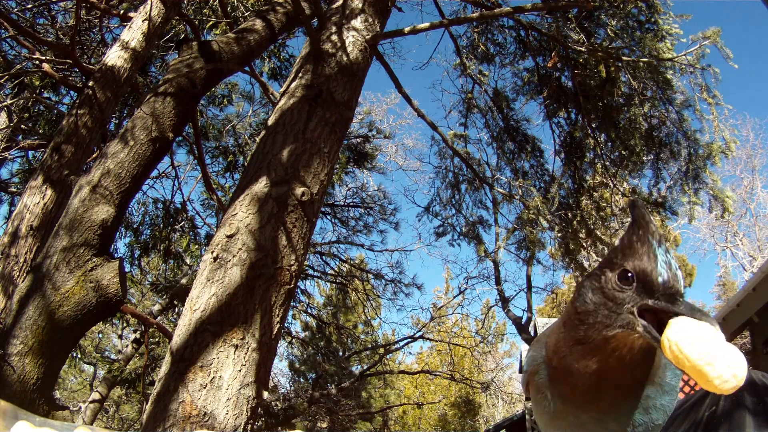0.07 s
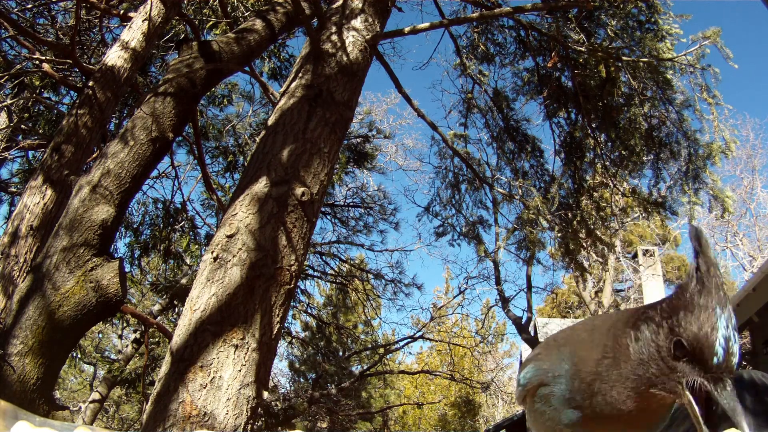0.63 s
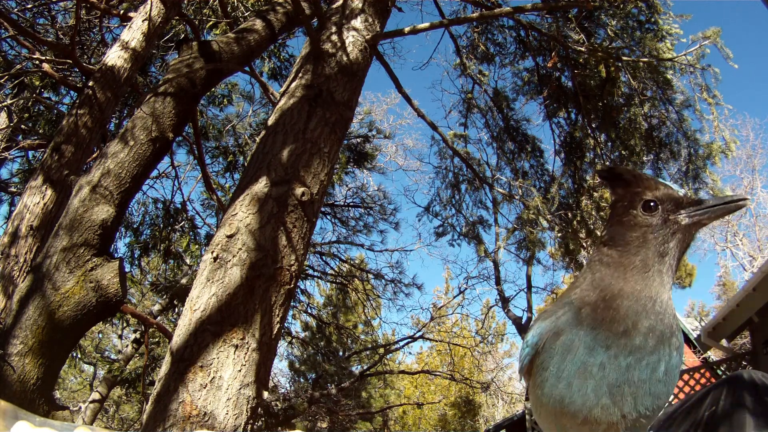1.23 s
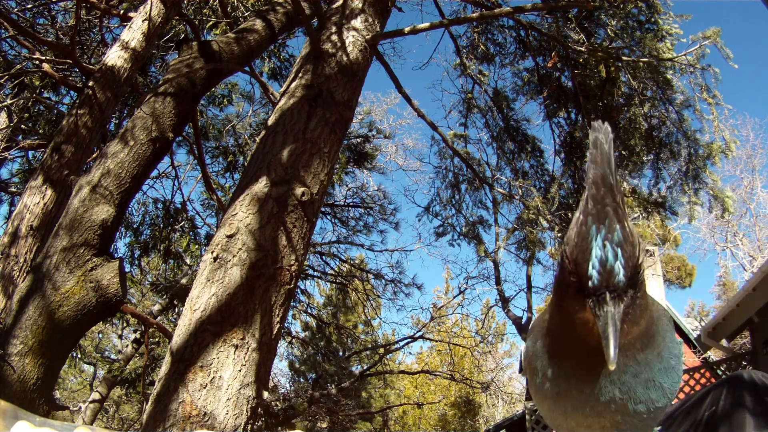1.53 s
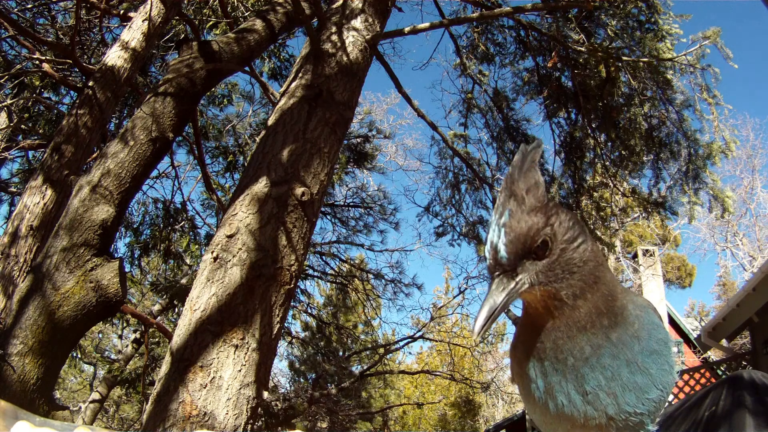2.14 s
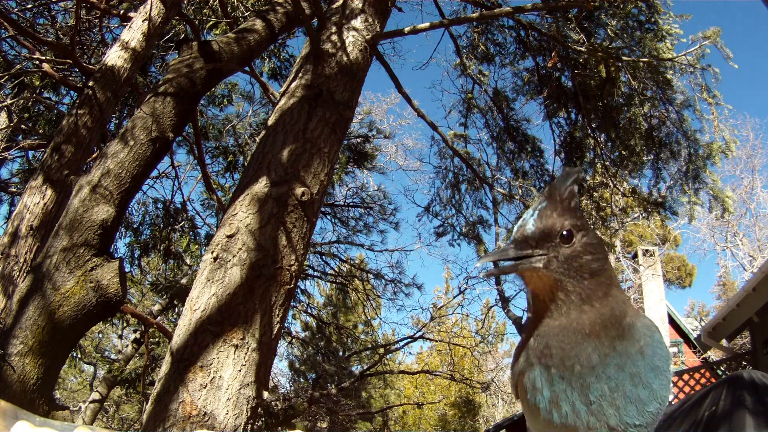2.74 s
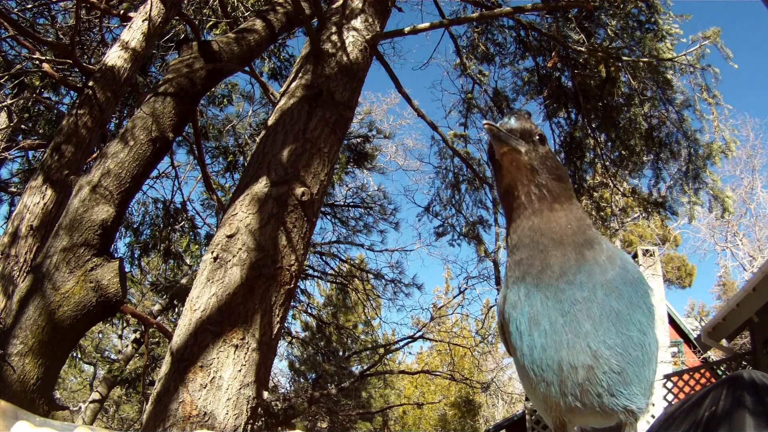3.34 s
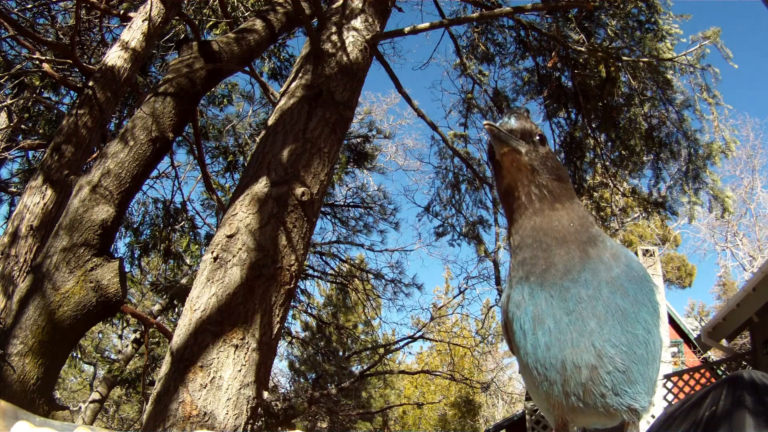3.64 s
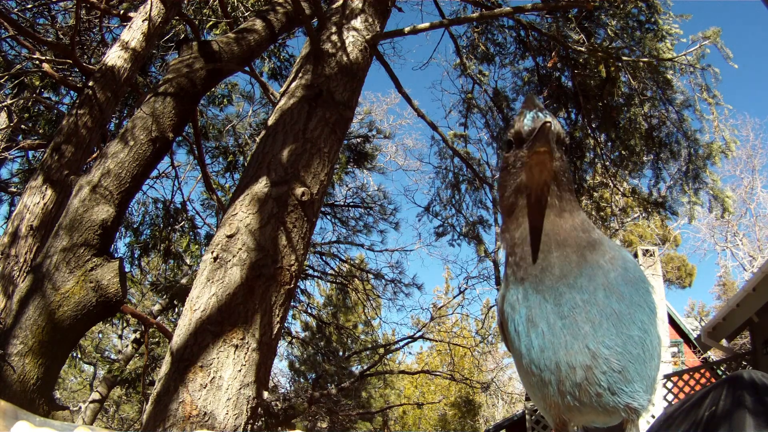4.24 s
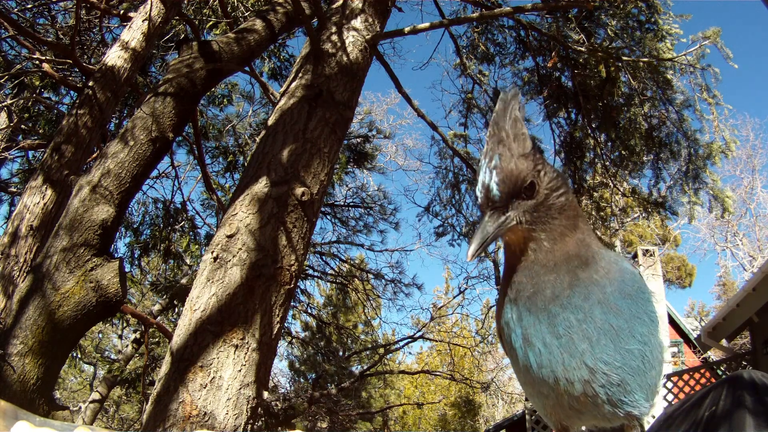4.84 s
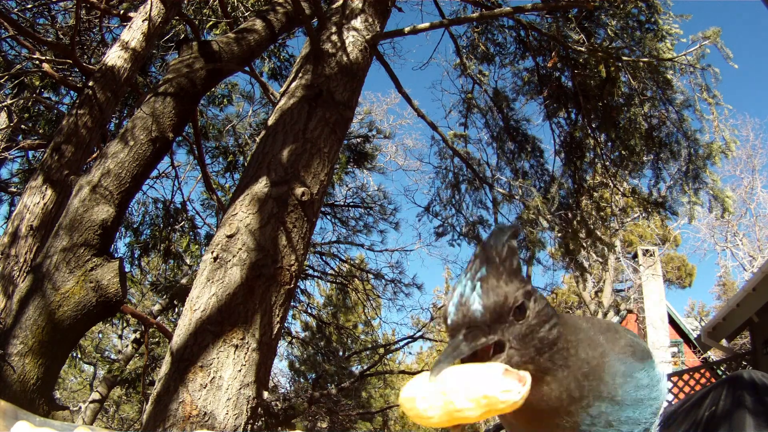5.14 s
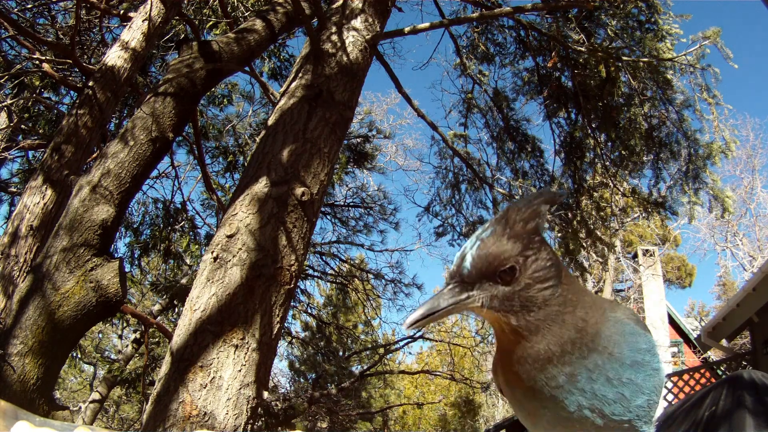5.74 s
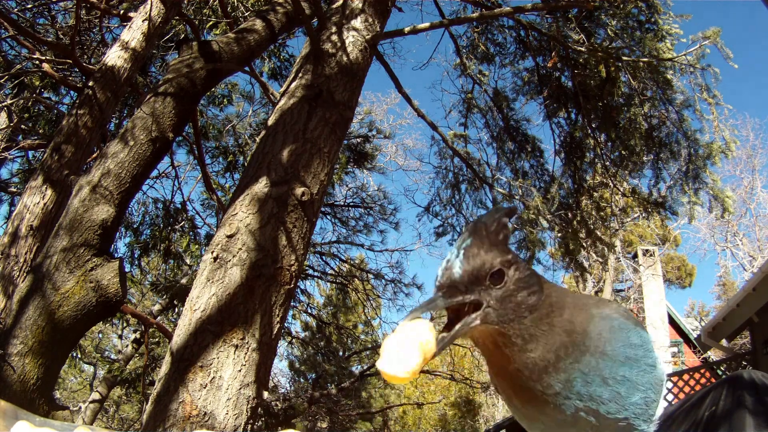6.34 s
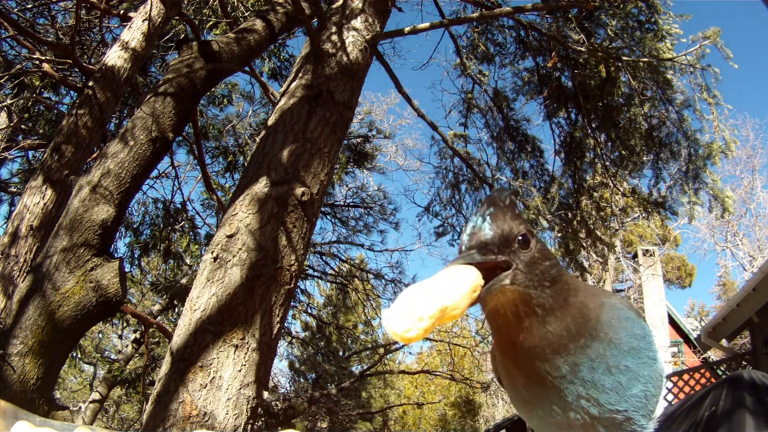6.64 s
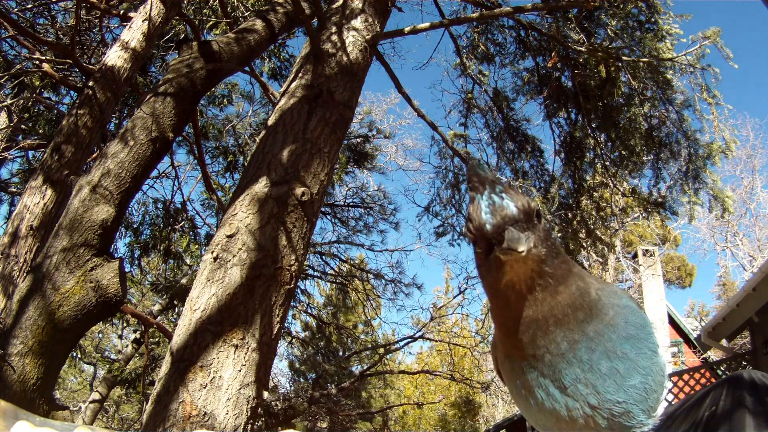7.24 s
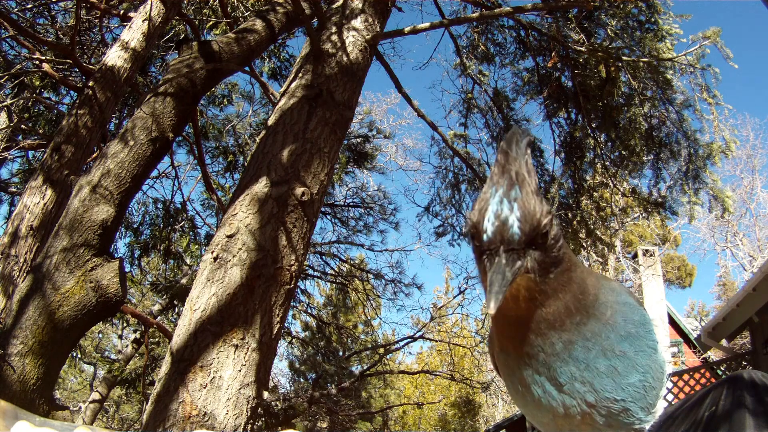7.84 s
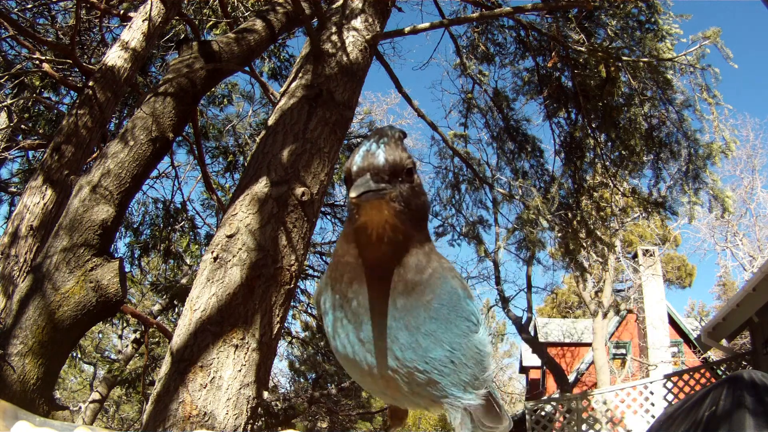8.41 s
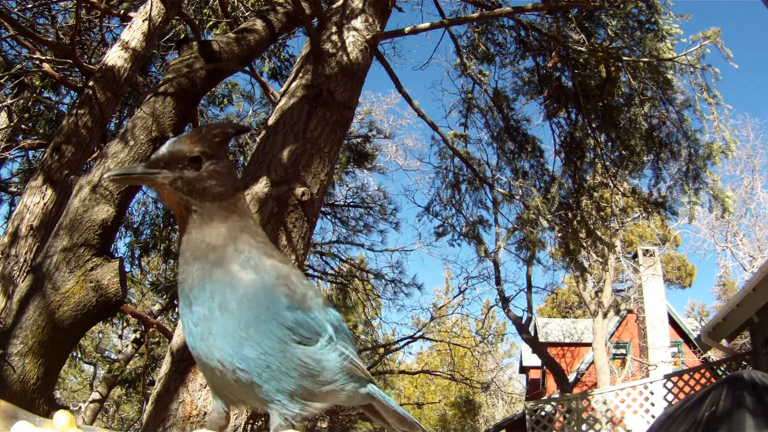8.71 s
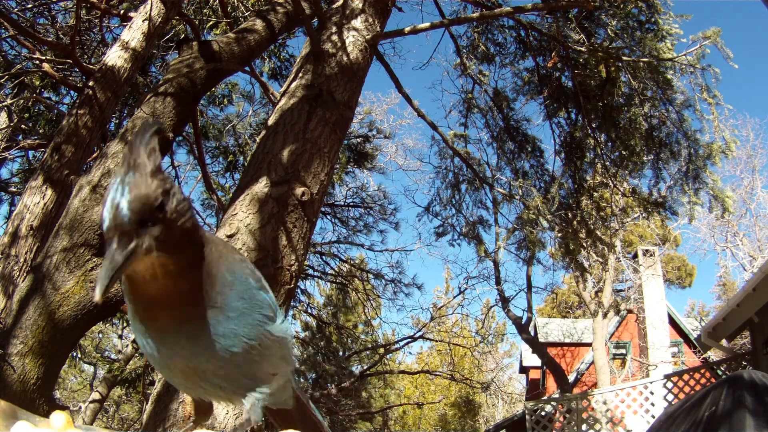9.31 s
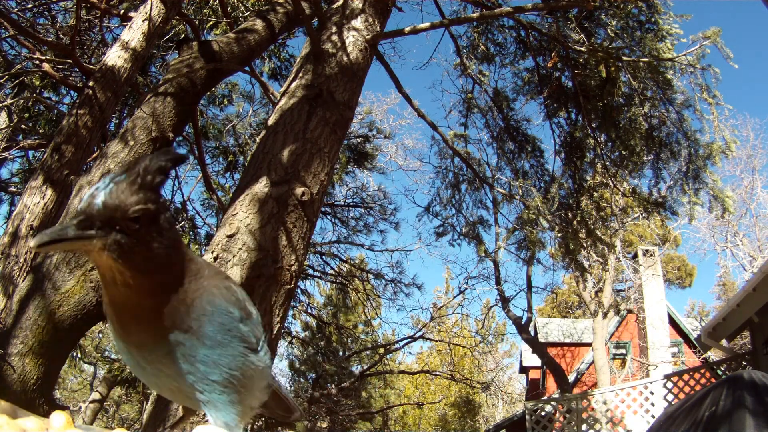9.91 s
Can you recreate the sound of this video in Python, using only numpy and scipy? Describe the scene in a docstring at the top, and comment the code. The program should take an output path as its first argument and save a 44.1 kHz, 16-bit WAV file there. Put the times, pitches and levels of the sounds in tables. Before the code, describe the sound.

A bird knocks and rattles hollow peanut shells on a tray close by, then hops with rustling wing beats over a faint engine drone.

```python
"""A jay picks up peanuts in the shell from a feeding tray, weighs them and puts them back, very close by.
The hollow shells crack and rattle as they knock, rasp as they slide, and make the tray boom softly.
The bird hops about with ticking claws and short wing beats that rustle and push the air.
One nut falls and bounces with a bright clack. Behind it all are a quiet garden and a far, droning engine."""
import sys
import numpy as np
from scipy import signal
from scipy.fft import rfft, irfft
from scipy.io import wavfile
from scipy.ndimage import map_coordinates

SR = 44100
rng = np.random.default_rng(int(sys.argv[2]) if len(sys.argv) > 2 else 0)


def dump(signal):
    """Clip the signal to [-1, 1] and save it as 16-bit WAV at the path in sys.argv[1]."""
    limited = np.clip(np.atleast_2d(signal).T, -1, 1)
    pcm = np.round(limited * 32767).astype(np.int16)
    wavfile.write(sys.argv[1], SR, pcm)


N = 439676


def amp(db):
    """Turns decibels into a number to multiply by."""
    return 10 ** (np.asarray(db) / 20)


def unit(x):
    """Scales a sound to an average strength (rms) of 1."""
    return x / np.sqrt(np.mean(x ** 2) + 1e-20)


def add(mix, start, sound):
    """Mixes a sound in at a start time in seconds."""
    part = mix[max(round(start * SR), 0):][:len(sound)]
    part += sound[:len(part)]


def wander(size, rate):
    """A smooth random curve that changes about rate times a second."""
    at = np.arange(size) * rate / SR
    return map_coordinates(rng.standard_normal(int(at[-1]) + 3), [at], order=2, mode="nearest")


def ring(tones, size, detune, scale=1):
    """A struck thing rings with dying tones, a little different for each spot that is hit."""
    t = np.arange(size) / SR
    shifts = scale * np.exp(detune * rng.standard_normal(len(tones)))
    return sum(amp(db - 60 * t / fade_s) * np.cos(2 * np.pi * hz * shift * t)
               for (hz, db, fade_s), shift in zip(tones, shifts))


def grains(size, per_s, spread_db):
    """Tiny clicks at random moments, of uneven strength."""
    strength = amp(spread_db * np.minimum(rng.exponential(1, size), 3.5))
    return unit(strength * rng.choice([-1, 1], size) * (rng.random(size) < per_s / SR))


def stroke(length_s, rise_s, fall_s):
    """The loudness of a movement: it swells, holds and dies away."""
    t = np.arange(int((length_s + 6 * fall_s) * SR)) / SR
    return (1 - np.exp(-t / rise_s)) * np.exp(-np.maximum(t - length_s, 0) / fall_s)


# pitches the microphone barely hears: (pitch [Hz], width [Hz], depth [dB])
DEAF_BANDS = [(6020, 420, -18), (12050, 880, -20)]
def shape_tone(x, colour):
    """Gives a sound its tone colour, turns down the deaf bands and scales it to strength 1."""
    f = np.fft.rfftfreq(len(x), 1 / SR)
    dips_db = sum(depth * np.exp(-abs((f - hz) / width) ** 1.4) for hz, width, depth in DEAF_BANDS)
    hz, db = np.transpose(colour)
    colour_db = np.interp(np.log(f + 1), np.log(hz), db)
    return unit(irfft(rfft(x) * amp(dips_db + colour_db), len(x)))


# tone colour of the garden: (pitch [Hz], level [dB])
GARDEN_COLOUR = [(20, -11.5), (40, -2), (58, -3), (90, -2.5), (130, -5), (190, -7), (280, -9), (450, -14.5),
                 (700, -19.5), (1500, -24.5), (3000, -27.5), (7500, -34.5), (13200, -40), (14000, -51)]
def garden(level_db=-58.0, swell_db=0.1):
    """The garden is a far rumble and a soft, even hiss."""
    loudness = amp(level_db + swell_db * wander(N, 2.665))
    return loudness * shape_tone(rng.standard_normal(N), GARDEN_COLOUR)


# how the engine runs: (time [s], cycle rate [Hz], level [dB])
ENGINE_RUN = [(0.0, 37.65, -55), (1.2, 37.14, -53.5), (2.2, 36.91, -51.5), (3.3, 36.95, -53.5),
              (4.2, 36.97, -52), (5.3, 36.85, -49.5), (6.6, 36.97, -51.5), (7.8, 36.7, -56.5),
              (9.95, 36.19, -60)]
# its tones: (pitch [x cycle rate], level [dB], drift [dB/s], echo strength [x direct sound],
# time between swells [s], time of one swell [s])
ENGINE_TONES = [(2.0, -2, -0.11, 0.43, 9.0, 0.18), (3.0, 0.0, 0.0, 0.25, 2.37, 1.84),
                (4.0, 3, -1.26, 0.45, 3.67, 2.03), (4.5, -12.57, 1.03, 0.12, 2.27, 0.13),
                (6.0, -10, 0.0, 0.46, 5.13, 0.42)]
def engine(waver_db=0.5):
    """A far engine's low tones stay roughly in step with its firing, so the drone throbs."""
    t = np.arange(N) / SR
    times, cycle_hz, run_db = np.transpose(ENGINE_RUN)
    cycles = np.cumsum(np.interp(t, times, cycle_hz)) / SR + 2 * rng.random()
    drone = np.zeros(N)
    for multiple, db, drift, echo, period, crest in ENGINE_TONES:
        # the tone swells and fades as its echo drifts in and out of step with it
        swell = abs(1 + echo * np.exp(2j * np.pi * (t - crest) / period))
        level = amp(np.interp(t, times, run_db) + db + drift * t + waver_db * wander(N, 5))
        tone = np.cos(2 * np.pi * multiple * cycles + 0.5 * rng.standard_normal())
        drone += np.sqrt(2) * swell * level * tone
    return drone


# borders of a knock's five bands, called body, low middle, high middle, edge and top: (pitch [Hz])
KNOCK_BANDS = [300, 900, 2000, 3500, 8400, 15500]
def knocks(contacts, tones, colour, detune, ring_db, crush_db, crush_s, scatter_db, scatter_s):
    """Each contact snaps and briefly crushes ridges; the shell rings and things nearby scatter the sound."""
    out = np.zeros(N)
    size, lead, blow = 2048, 128, 256  # samples: whole knock, part before the snap, loud opening
    t = (np.arange(size) - lead) / SR
    bands = [signal.butter(3, edges, "band", fs=SR, output="sos")
             for edges in zip(KNOCK_BANDS, KNOCK_BANDS[1:])]
    crush = amp(crush_db) * np.exp(-abs(t) / np.where(t < 0, 0.7 * crush_s, crush_s))
    scatter = amp(scatter_db) * np.exp(-abs(t) / scatter_s) * (t > 0)
    for time, hz, db, body_db, edge_db, top_db in contacts:
        force = (crush + scatter) * rng.standard_normal(size)
        force[lead] += rng.choice([-1, 1])  # the snap
        ringing = signal.fftconvolve(force, ring(tones, size, detune, scale=hz))[:size]
        sound = shape_tone(force + amp(ring_db) * ringing, colour)
        # the middle leans towards the main pitch; the contact's hardness sets the bands around it
        upper = np.clip(1 / (1 + (KNOCK_BANDS[2] / hz) ** 5), 0.17, 0.85)
        shares = amp(body_db), np.sqrt(1 - upper), np.sqrt(upper), amp(edge_db), amp(top_db)
        for band, share in zip(bands, shares):
            part = signal.sosfilt(band, sound)
            add(out, time + t[0], amp(db) * share * part / np.std(part[:blow]))
    return out


# beak and shell knock on the tray; body and edge count from the knock's level:
# (time [s], main pitch [Hz], level [dB], hollow body [dB], hard edge [dB], change per rebound [dB])
SHELL_TAPS = [(0.248, 1800, -46.5, -7, -19, -7), (0.271, 1630, -35.5, -16, -27, -30),
              (0.3002, 1700, -34.5, -13, -7, -25), (0.3043, 2100, -24, -6, -32, -22),
              (0.3229, 1300, -34, -2.5, -11, -6.5), (0.3393, 2130, -37.5, -11, -27, -20),
              (0.3909, 1920, -46.5, -13, -25, -20), (0.502, 2550, -38.5, -9, -7, -20),
              (0.5128, 1900, -37, -6, -8.5, -6.5), (0.6025, 1810, -34, -17, -17, -6),
              (0.6123, 2480, -34, -14, -9, -30), (0.6905, 1680, -34.5, -10.5, -13, -2.5),
              (0.7113, 2020, -39, -8, -8, -20), (0.7768, 2010, -31, -10.5, -17, -13),
              (0.7981, 2580, -24, -25, -29, -22), (0.8012, 2450, -38, 1.5, -7, -18),
              (0.9198, 1390, -36, -11.5, -18, -19), (0.9259, 1260, -38, -19, -23, -25),
              (1.2847, 2670, -46.5, -29, -7.5, -6), (2.3614, 2040, -43, -4, -19, -2),
              (2.3706, 1490, -38, -6, -6.5, -4), (2.4088, 2130, -37, -21, -20, -20),
              (2.4165, 2050, -34.5, -21, -20, -13), (2.4323, 1580, -34.5, -27, -26, -18),
              (2.4495, 2190, -44, -16, -16, -16), (2.4887, 1950, -29.5, -15, -11, -3),
              (2.5418, 2800, -62, -7, 7, -20), (2.6795, 1900, -31.5, -10.5, -4, -5),
              (3.157, 3300, -57.5, -7, -6, -3), (4.93, 2300, -49, -12, -9, -18),
              (5.0084, 1780, -30.5, -6, -18.5, -29), (5.116, 2750, -50, -8, -3, -20),
              (5.2271, 1560, -28.5, -8, -8, -6.5), (5.3391, 2120, -54, -19, -2, -20),
              (5.4767, 2307, -50, -18, -8, -2), (5.5237, 1590, -44.5, -5, -8, -14),
              (5.5404, 2240, -35.5, -10.5, -11, -6), (5.982, 1420, -50, -8, -8, -13),
              (5.9983, 2024, -46.5, -9, -7.5, -1), (6.1019, 2100, -27, -14, -7.5, -16),
              (6.1513, 2280, -46.5, -11, -8, -21), (6.1666, 2540, -51.5, -3, -7, -15),
              (6.375, 1860, -47.5, -12, -15, -1.5), (6.4902, 2430, -37, -11, -7, -2.5),
              (6.6411, 1530, -46.5, -4, -9, -15), (6.7022, 1780, -36.5, -4, -11, -24),
              (6.7216, 1580, -26, -6, -10.5, -17), (6.736, 2000, -36, -11, -10, -18),
              (6.7618, 1906, -40.5, -13, -19, -20), (7.6111, 1920, -51, -21, -13, -5),
              (9.5322, 2020, -36, -9, -13.5, -3.5), (9.5583, 1760, -37.5, -8.5, -20, -12),
              (9.7064, 1850, -32, -18, -7.5, -5.5), (9.7158, 3030, -29, -9, -10.5, -7)]
def rattles(graze_s=0.0024, graze_db=-19, rebound_s=0.0044, rebounds=2, top_db=-13):
    """Lists each tap's contacts: a light graze, the blow, then weaker rebounds on other spots."""
    contacts = []
    for time, hz, db, body_db, edge_db, rebound_db in SHELL_TAPS:
        hardness = body_db, edge_db, top_db
        contacts += [(time - graze_s, hz, db + graze_db, *hardness), (time, hz, db, *hardness)]
        for gap, spot in rng.standard_normal((rebounds, 2)):
            time += rebound_s * np.exp(0.15 * gap)
            db += rebound_db
            contacts.append((time, hz * np.exp(0.053 * spot), db, *hardness))
    return contacts


# tones of a shell held by beak or tray: (pitch [x main pitch], level [dB], time to fade 60 dB [s])
HELD_SHELL_TONES = [(.62, -6, .006), (1, 0, .007), (1.4, -4, .005), (2.1, -11, .004)]
# tone colour of a shell's brittle snap: (pitch [Hz], level [dB])
SNAP_COLOUR = [(300, -10), (420, -1.5), (800, -0.5), (1300, 8), (2600, -0.5), (4500, -3.5), (5300, -1.5),
               (7500, -6), (9800, 0), (14200, -3), (15200, -10)]
def shells(gain_db=-3):
    """A held peanut cannot ring long, so it gives a dry crack. Claws and nudged shells tick alike."""
    contacts = rattles() + claws()
    contacts += nudges(SHELL_DRAGS, above_db=1, spread_db=6, hz=1950, body_db=-11, edge_db=-16, count=4)
    contacts += nudges(WING_BEATS, above_db=2.5, spread_db=7.5, hz=2300, body_db=-12, edge_db=-2, count=3)
    return amp(gain_db) * knocks(contacts, HELD_SHELL_TONES, SNAP_COLOUR, detune=0.036, ring_db=-25,
                                 crush_db=-17, crush_s=0.0011, scatter_db=-32.5, scatter_s=0.0039)


# tones of the tray: (pitch [Hz], level [dB], time to fade 60 dB [s])
TRAY_TONES = [(88, -9, .12), (168, 0, .2), (402, -14, .08), (565, -20, .04)]
def tray(knock_db=-17, hop_db=2, strong_beat_db=-46, lag_s=0.00647):
    """The tray booms softly under each tap, and when the bird pushes off with a strong wing beat."""
    out = np.zeros(N)
    blows = [(time, db + knock_db) for time, _, db, *_ in SHELL_TAPS]
    blows += [(start + lag_s, db + hop_db) for start, _, db, _ in WING_BEATS if db > strong_beat_db]
    for time, db in blows:
        add(out, time, amp(db) * ring(TRAY_TONES, size=12000, detune=0.0045))
    return out


# shells dragged over the tray and each other: (start [s], end [s], level [dB])
SHELL_DRAGS = [(0.304, 0.342, -49.5), (0.495, 0.52, -49.5), (1.273, 1.306, -71), (2.356, 2.445, -42.5),
               (2.458, 2.548, -55), (2.488, 2.51, -44.5), (4.972, 5.047, -56.5), (5.231, 5.243, -49.5),
               (5.968, 6.025, -56.5), (6.363, 6.4, -58.5), (6.711, 6.769, -61), (9.701, 9.727, -44)]
# tone colour of their rasp: (pitch [Hz], level [dB])
RASP_COLOUR = [(150, -10), (400, 4.5), (900, 5), (1500, 2), (2400, 0.5), (3500, -3.5), (5000, -7),
               (7500, -10.5), (9700, -7), (14400, -14), (15500, -34)]
def scrapes(gain_db=-1, judder_db=1, ring_db=-27, shell_hz=1950, slide_s=0.02, slide_db=-26):
    """A ridged shell slides in tiny catches that make it ring. Every tap also ends in a short slide."""
    out = np.zeros(N)
    slides = [(time, time + slide_s, db + slide_db) for time, _, db, *_ in SHELL_TAPS]
    for start, end, db in list(SHELL_DRAGS) + slides:
        push = stroke(end - start, rise_s=0.0004, fall_s=0.013)
        size = len(push)
        slips = grains(size, per_s=2500, spread_db=7.5) * amp(-judder_db * wander(size, 203))
        shell = ring(HELD_SHELL_TONES, size=512, detune=0.1, scale=shell_hz)
        ringing = amp(ring_db) * signal.fftconvolve(slips, shell)[:size]
        add(out, start, amp(db + gain_db) * push * shape_tone(slips + ringing, RASP_COLOUR))
    return out


def nudges(movements, above_db, spread_db, hz, body_db, edge_db, count, top_db=-13):
    """Lists the loose shells each movement bumps at random moments; stronger moves bump harder."""
    contacts = []
    for start, end, db, *_ in movements:
        for moment, spot, force in rng.random((count, 3)):
            time = start + (end - start) * moment
            level_db = db + above_db + spread_db * (force - 0.5)
            contacts.append((time, hz * 2 ** (spot - 0.5), level_db, body_db, edge_db, top_db))
    return contacts


# wing beats and feather shuffles: (start [s], end [s], rustle [dB], push of air [dB])
WING_BEATS = [(2.189, 2.217, -65, -75), (2.233, 2.278, -58, -62), (3.136, 3.26, -76, -81),
              (4.901, 4.96, -64, -75), (5.059, 5.137, -65.5, -75), (5.623, 5.705, -63.5, -66),
              (6.036, 6.212, -66, -66), (7.972, 8.068, -61, -67), (8.085, 8.136, -49.5, -75),
              (8.163, 8.236, -42.5, -52), (8.245, 8.308, -53.5, -52), (8.508, 8.588, -47, -55),
              (8.612, 8.704, -41, -41), (8.702, 8.784, -57.5, -55), (8.849, 8.879, -65, -70),
              (9.235, 9.328, -64.5, -63), (9.32, 9.423, -45.5, -46.5), (9.429, 9.503, -57.5, -48.5)]
# tone colour of rustling feathers: (pitch [Hz], level [dB])
FEATHER_COLOUR = [(50, -44), (100, -12.5), (250, -5.5), (400, 1.5), (900, 0), (1600, 1), (3400, -2),
                  (5000, -10.5), (7500, -11.5), (10000, -12.5), (14400, -17.5), (15400, -39)]
# tone colour of the puff of air: (pitch [Hz], level [dB])
PUFF_COLOUR = [(20, -24), (55, -3), (90, 6), (125, 18), (180, -12), (300, -14), (800, -67)]
def wings(rustle_gain_db=3.5, air_gain_db=-1, flutter_db=3.5, fullness=0.14):
    """Feathers brush over each other while the wing pushes air at the microphone."""
    out = np.zeros(N)
    hz, colour_db = np.transpose(FEATHER_COLOUR)
    for start, end, rustle_db, air_db in WING_BEATS:
        beat = stroke(end - start, rise_s=0.0034, fall_s=0.01)
        size = len(beat)
        # a gentle shuffle is thin, a strong beat is full; no two have quite the same colour
        low_db = fullness * (rustle_db + 45) * (hz < 1200)
        lumps_db = 1.5 * rng.standard_normal(len(hz))
        colour = np.column_stack([hz, colour_db + low_db + lumps_db])
        brushing = grains(size, per_s=3000, spread_db=1.5) * amp(flutter_db * wander(size, 114))
        rustle = amp(rustle_db + rustle_gain_db) * shape_tone(brushing, colour)
        air = amp(air_db + air_gain_db) * shape_tone(rng.standard_normal(size), PUFF_COLOUR)
        add(out, start, beat * (rustle + air))
    return out


# claws tick on the tray: (time [s], level [dB])
CLAW_TICKS = [(7.944, -51), (8.0083, -45.5), (8.1248, -39.5), (8.1359, -37.5), (8.1835, -30), (8.23, -44),
              (8.2726, -36.5), (8.302, -43), (8.5134, -43), (8.5874, -43), (8.6165, -38), (8.6474, -28.5),
              (8.664, -31), (8.6940, -30), (8.7633, -54), (9.3002, -44), (9.3392, -34), (9.3948, -45),
              (9.446, -42)]
def claws(hz=2500, body_db=-11, edge_db=-4, top_db=-15.5):
    """Lists the contacts of claws catching the tray as the bird shifts and hops."""
    return [(time, hz, db, body_db, edge_db, top_db) for time, db in CLAW_TICKS]


# a dropped nut bounces; body, edge and top count from the bounce's level:
# (time [s], main pitch [Hz], level [dB], hollow body [dB], hard edge [dB], crisp top [dB])
NUT_BOUNCES = [(8.3262, 3850, -31.5, -17.5, 4, -12), (8.3684, 3840, -37.5, -13.5, -1.5, -11.5),
               (8.4404, 3660, -50.5, -18, 4.5, -23), (8.4705, 3830, -46.5, -8.5, -6, -10)]
# tones of a nut that rings freely: (pitch [x main pitch], level [dB], time to fade 60 dB [s])
FREE_NUT_TONES = [(.39, -9, .011), (.68, -5, .016), (.88, -5, .015), (1, -1, .016), (1.07, -3, .014),
                  (1.25, -1, .014), (1.35, 1, .013), (1.8, -4, .013), (2.02, -11, .016)]
# tone colour of its hard landing: (pitch [Hz], level [dB])
SMACK_COLOUR = [(400, -9), (2500, -10.5), (4000, -6.5), (5200, 0.5), (7000, 2), (8200, -5.5), (10000, -7),
                (12000, -26), (14700, -4), (15400, -36)]
def falling_nut(gain_db=4.5):
    """A loose peanut clacks brighter and rings longer than a held one."""
    return amp(gain_db) * knocks(NUT_BOUNCES, FREE_NUT_TONES, SMACK_COLOUR, detune=0.015, ring_db=-33,
                                 crush_db=-17, crush_s=0.0005, scatter_db=-26, scatter_s=0.003)


def scene():
    """Everything reaches one microphone, so left and right are alike."""
    mono = shells() + falling_nut() + scrapes() + wings() + tray() + engine() + garden()
    return np.array([mono, mono])


def record(dry):
    """The camera leaks a faint copy of the bass as a thin whine near 12 kHz, and cuts the highest treble."""
    bass_hz, whine_hz, cut_hz = 450, 12000, 15500
    bass = signal.sosfilt(signal.butter(2, bass_hz, fs=SR, output="sos"), dry)
    high_tone = np.cos(2 * np.pi * whine_hz * np.arange(N) / SR)
    whine = amp(2.5) * np.gradient(bass, axis=1) * high_tone
    treble_cut = signal.firwin(161, cut_hz, window=("kaiser", 9), fs=SR)
    return signal.oaconvolve(dry + whine, treble_cut[None], "same", axes=1)


dry = scene()
out = record(dry)
dump(out)
```